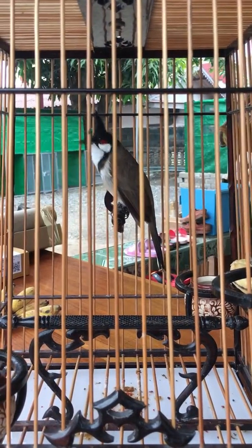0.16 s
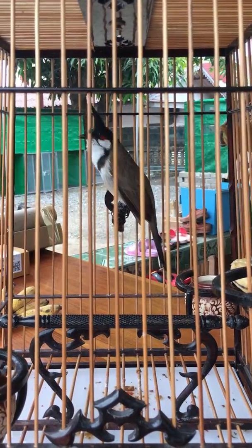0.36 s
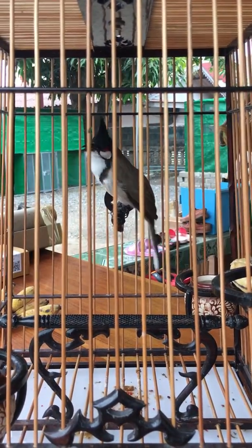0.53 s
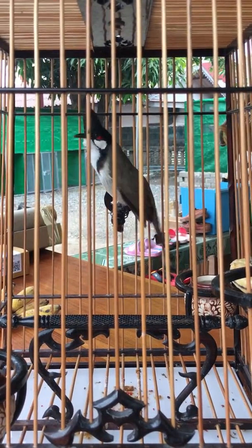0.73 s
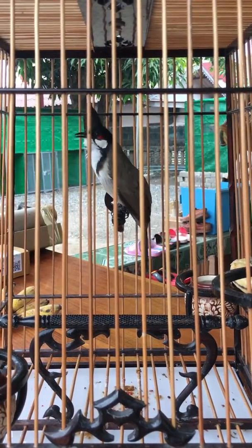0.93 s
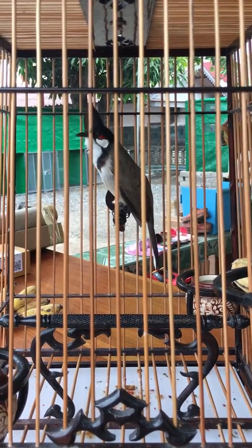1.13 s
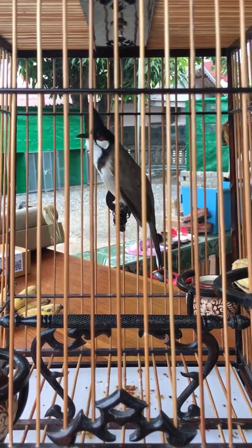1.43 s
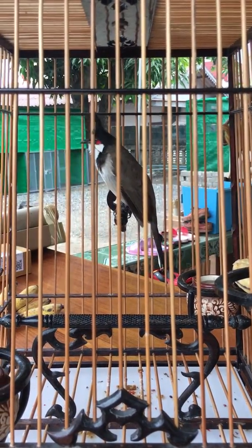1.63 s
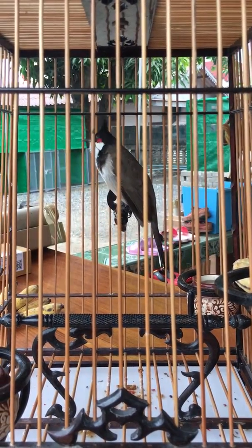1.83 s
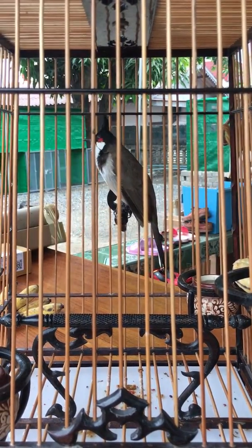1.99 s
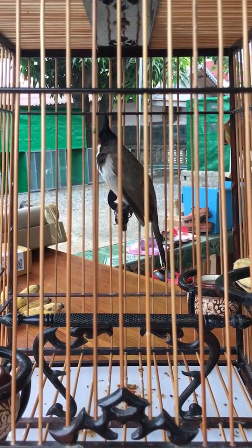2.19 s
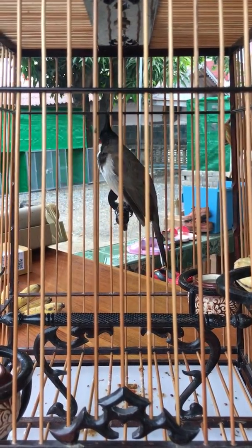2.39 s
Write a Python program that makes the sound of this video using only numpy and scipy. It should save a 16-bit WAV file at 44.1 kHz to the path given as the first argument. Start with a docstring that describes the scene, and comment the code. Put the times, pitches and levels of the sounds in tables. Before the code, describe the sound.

A caged songbird whistles five quick, loud notes close by, over a distant chugging engine

```python
"""Caged bulbul phrase

Five quick, loud whistled notes close by, under a roof with a short echo: swept sines with overtones and rasp.
Softer birds call farther off as plain sine whistles with much echo.
A distant one-cylinder engine rings its exhaust at each firing, idles, speeds up and returns to idle.
Shaped noise makes the outdoor rumble and hiss; two wavering sines make thin whines."""
import sys
import numpy as np
from scipy import signal
from scipy.fft import rfft, irfft
from scipy.io import wavfile
from scipy.ndimage import uniform_filter1d, minimum_filter1d

SR = 44100
rng = np.random.default_rng(int(sys.argv[2]) if len(sys.argv) > 2 else 0)


def dump(signal):
    """Clip the signal to [-1, 1] and save it as 16-bit WAV at the path in sys.argv[1]."""
    limited = np.clip(np.atleast_2d(signal).T, -1, 1)
    pcm = np.round(limited * 32767).astype(np.int16)
    wavfile.write(sys.argv[1], SR, pcm)


N = 112454

# outdoor rumble spectrum: freq_hz, relative_density_db
RUMBLE_SPECTRUM = [(20, -20), (90, 2), (200, 0), (430, -3.5), (540, -5.5), (820, -10.5), (1130, -4),
                   (1600, -9), (2600, -4), (3300, -9), (4500, -18.5), (9000, -40)]
# rumble level: time_s, level_db
RUMBLE_LEVEL = [(0, -38), (.2, -37.5), (.32, -41.5), (.6, -44.5), (.8, -40.5), (1.04, -41), (1.14, -36),
                (2.0, -35.5), (2.55, -37)]
# outdoor hiss spectrum: freq_hz, relative_density_db
HISS_SPECTRUM = [(2000, -8), (3600, 1), (4400, -2.5), (5000, 5.5), (5600, 2), (6400, 5.5), (7000, 0),
                 (7450, 7.5), (7950, -3), (8500, 6), (9200, -5), (10200, -2), (10700, -7), (11400, -8),
                 (12300, -15), (15500, -19)]
# hiss level: time_s, level_db
HISS_LEVEL = [(0, -44.5), (.2, -52), (.35, -52.5), (.55, -48), (1.15, -42), (2.25, -42), (2.55, -52.5)]
FLICKER_DB, FLICKER_PER_S = 1.0, 24.75

# low whine level: time_s, level_db
LOW_WHINE_LEVEL = [(0, -47), (.17, -48), (.25, -43.5), (.42, -40), (.65, -57.5), (.8, -48.5), (1.05, -54),
                   (1.7, -49.5), (2.05, -43.5), (2.55, -48)]
# high whine level: time_s, level_db
HIGH_WHINE_LEVEL = [(0, -73), (1.7, -55.5), (1.98, -46.5), (2.08, -57), (2.19, -43), (2.27, -59),
                    (2.4, -53), (2.55, -75)]
LOW_WHINE_HZ, HIGH_WHINE_HZ = 1095, 9390
WHINE_WAVER_DB, WHINE_WAVER_PER_S = 2.97, 22.19
WHINE_DRIFT_HZ, WHINE_DRIFT_PER_S = 6, 39.24

# engine speed: time_s, firings_per_s
ENGINE_SPEED = [(.6, 15.1), (.8, 16.9), (1.0, 17.8), (1.2, 18.3), (1.7, 18.3), (1.87, 17.7), (2.03, 15.1)]
# engine level, relative to ENGINE_DB: time_s, relative_level_db
ENGINE_LEVEL = [(.2, 0.5), (.3, -2.5), (1.05, -3), (1.15, -1), (2.1, 1)]
# exhaust resonances at idle: freq_hz, t60_s, relative_level_db
EXHAUST_MODES = [(62.9, .25, -8), (77.7, .25, -3), (109, 0.18, -4), (121.5, 0.11, -6), (178.4, 0.14, -18)]
FIRST_FIRING_S, ENGINE_DB = .030, -32.5
FIRING_SCATTER_DB, FIRING_SCATTER_S = 1.24, .00056
EXHAUST_HIGHPASS_HZ, EXHAUST_RISE_S = 58, .008
# tilt: dB per octave about the pivot, per firing/s above idle
REV_TILT_DB, REV_PIVOT_HZ = 2.5, 92

# distant bird calls, one curve each: time_s, pitch_hz, relative_level_db
FAR_CALLS = [
    [(0, 2468, -29.5), (.035, 2380, -32)],
    [(1.505, 2413, -42), (1.535, 2406, -29), (1.55, 2395, -24.5), (1.58, 2480, -44)],
    [(1.62, 1654, -43), (1.71, 1756, -42)],
    [(1.825, 2890, -38), (1.853, 2920, -27)],
    [(1.848, 3370, -40), (1.86, 3250, -30), (1.868, 3043, -29.5), (1.98, 3010, -42)],
    [(1.915, 3620, -38), (1.99, 3550, -40)],
    [(1.93, 1500, -37), (1.945, 1250, -37)],
]
FAR_DIRECT_DB, FAR_ECHO_DB = -1, -3
FAR_JITTER_FRACTION, FAR_JITTER_PER_S = .0096, 300

# reflections from cage, table and roof: delay_s, relative_level_db
REFLECTIONS = [(.0069, -10), (.00706, -13.5), (0.0185, -14.5)]
ROOM_DB, ROOM_T60_S, ROOM_GAP_S = -15, .38, .006
# echo tail spectrum: freq_hz, relative_density_db
ROOM_SPECTRUM = [(500, 3.5), (3500, 1.5), (7000, -2.5), (15000, -4)]

# bulbul notes, one curve each: time_s, pitch_hz, level_db
PHRASE = [
    [(.219, 1940, -36), (.226, 2246, -26), (.2336, 2530, -12.5), (.2406, 2656, -10), (.263, 2648, -5.5),
     (.2724, 2482, -9.5), (.2775, 2468, -34)],
    [(.452, 1606, -38), (.460, 2016, -20), (.470, 1930, -18.5), (.4718, 2296, -4.5), (.488, 2457, -3),
     (.4994, 2396, -8), (.5015, 2957, -3.5), (.5148, 2910, -6.5), (.5176, 2600, -4.5), (.5306, 2495, -3.5),
     (.545, 2394, -14.5), (.5505, 2450, -32)],
    [(.652, 3640, -35), (.6538, 3530, -17), (.657, 2450, -20), (.661, 2760, -13), (.6657, 3350, -9.5),
     (.6716, 3050, -8), (.678, 2880, -4.5), (.6817, 2945, -25)],
    [(.7337, 1306, -33.5), (.7414, 2337, -18), (.7447, 1900, -17), (.7528, 2420, -5), (.756, 2397, -13),
     (.766, 2940, -3), (.7707, 3520, -9.5), (.775, 3320, -7.5), (.7856, 3390, -5), (.7906, 3420, -27)],
    [(.860, 3510, -23), (.866, 2640, -19), (.872, 2855, -8), (.8765, 3150, -8.5), (.8805, 2480, -11.5),
     (.8875, 2373, -3.5), (.900, 2250, -10), (.912, 2187, -17), (.929, 2020, -15), (.944, 2100, -27)],
]
# whistle overtones, second harmonic up: relative_level_db
OVERTONES_DB = [-36, -36, -42, -31, -29]
# rasp spectrum: freq_hz, relative_density_db
RASP_SPECTRUM = [(1200, -6.5), (3500, 0), (4500, -7), (8500, -14), (10300, -11), (11700, 0), (14000, -10)]
# first-note warble
WARBLE_CREST_S, WARBLE_HZ, WARBLE_DEPTH_HZ = .2505, 115, 352
WARBLE_MIDDLE_S, WARBLE_HALF_S = .243, .019
OVERTONE_TOP_HZ, FLUTTER_DB = 13500, 1.5
BRIGHT_PIVOT_HZ, BRIGHT_DB_PER_OCTAVE = 2646, 36
# pitch tremble: always present, and extra where softer than STEADY_DB
JITTER_FRACTION, JITTER_PER_S = .0078, 490
SOFT_JITTER_FRACTION, SOFT_JITTER_PER_S, STEADY_DB = .042, 520, -11
RASP_DB, RASP_POWER, RASP_DB_PER_OCTAVE = -34, .65, -12
# low puff as the fourth note starts
PUFF_S, PUFF_WIDTH_S, PUFF_DB, PUFF_HZ = .739, .010, -38, 1500

LOWPASS_HZ, CEILING, LIMITER_SAMPLES = 15720, .88, 256


def undb(db):
    """Decibels to gain."""
    return 10 ** (np.asarray(db) / 20)


def unit(x):
    """Scale to an rms of 1."""
    return x / np.sqrt(np.mean(x ** 2))


def clock():
    """Time of every sample, in seconds."""
    return np.arange(N) / SR


def curve(rows, axis=1):
    """One table column, linearly interpolated in time."""
    rows = np.array(rows, float)
    return np.interp(clock(), rows[:, 0], rows[:, axis])


def walk(rate_per_s):
    """Smooth random wander, rms 1 or near it: held random values, averaged twice."""
    hold = max(int(SR / rate_per_s), 1)
    steps = np.repeat(rng.standard_normal(N // hold + 1), hold)
    smooth = uniform_filter1d(uniform_filter1d(steps, hold), hold)
    return unit(smooth)[:N] if len(smooth) == N else unit(smooth[:N])


def noise(spectrum):
    """Unit-rms noise shaped by (freq_hz, db) points, joined on a log frequency axis."""
    freq_hz, db = np.array(spectrum, float).T
    bins_hz = np.maximum(np.fft.rfftfreq(N, 1 / SR), 1)
    gain = undb(np.interp(np.log(bins_hz), np.log(freq_hz), db))
    return unit(irfft(rfft(rng.standard_normal(N)) * gain, N))


def turn(hz):
    """Phase of an oscillator at a moving pitch."""
    return 2 * np.pi * np.cumsum(hz) / SR


def fade(t60_s):
    """Exponential decay from time zero, 60 dB in t60_s."""
    return np.exp(-np.log(1000) * clock() / t60_s)


def note(rows):
    """Pitch and gain of one note, silent outside its curve."""
    t = clock()
    sounding = (t >= rows[0][0]) & (t <= rows[-1][0])
    gate = uniform_filter1d(sounding * 1., size=64)
    return curve(rows), undb(curve(rows, axis=2)) * gate


def echo(x):
    """Diffuse tail of the roofed space: convolution with decaying noise after a short gap."""
    tail = noise(ROOM_SPECTRUM) * fade(ROOM_T60_S) * (clock() > ROOM_GAP_S)
    tail = tail / np.sqrt(2 * np.sum(tail ** 2))
    return signal.fftconvolve(x, tail)[:N]


def outdoors():
    """Rumble and hiss: two shaped noises, each with a slight random level flicker."""
    out = 0
    for spectrum, level in [(RUMBLE_SPECTRUM, RUMBLE_LEVEL), (HISS_SPECTRUM, HISS_LEVEL)]:
        level_db = curve(level) + FLICKER_DB * walk(FLICKER_PER_S)
        out = out + noise(spectrum) * undb(level_db)
    return out


def whines():
    """Two thin sines, wavering in pitch and level."""
    out = 0
    for hz, level in [(LOW_WHINE_HZ, LOW_WHINE_LEVEL), (HIGH_WHINE_HZ, HIGH_WHINE_LEVEL)]:
        level_db = curve(level) + WHINE_WAVER_DB * walk(WHINE_WAVER_PER_S)
        phase = turn(hz + WHINE_DRIFT_HZ * walk(WHINE_DRIFT_PER_S))
        out = out + undb(level_db) * np.sin(phase)
    return out


def firing_pulses(lead):
    """Impulses at each whole engine cycle, scattered in time and strength, with a lead-in at idle."""
    idle = ENGINE_SPEED[0][1]
    speed = np.r_[np.full(lead, idle), curve(ENGINE_SPEED)]
    cycles = np.cumsum(speed) / SR - (lead / SR + FIRST_FIRING_S) * idle
    at = np.flatnonzero(np.diff(np.floor(cycles)))
    chance = rng.standard_normal((64, 2))[:len(at)]
    at = at + FIRING_SCATTER_S * SR * chance[:, 0]
    at = np.clip(at, 0, len(cycles) - 1).astype(int)
    pulses = np.zeros(len(cycles))
    pulses[at] = undb(FIRING_SCATTER_DB * chance[:, 1])
    return pulses


def engine():
    """Each firing rings the low exhaust resonances; the thump brightens with speed."""
    t, out = clock(), 0
    lead = SR // 2  # engine already running at time zero
    pulses = firing_pulses(lead)
    revs_above_idle = curve(ENGINE_SPEED) - ENGINE_SPEED[0][1]
    highpass = signal.butter(8, EXHAUST_HIGHPASS_HZ, "high", fs=SR, output="sos")
    for hz, t60_s, db in EXHAUST_MODES:
        ring = np.sin(2 * np.pi * hz * t) * fade(t60_s) * (1 - np.exp(-t / EXHAUST_RISE_S))
        ring = signal.sosfilt(highpass, ring)
        mode_db = db + REV_TILT_DB * revs_above_idle * np.log2(hz / REV_PIVOT_HZ)
        out = out + undb(mode_db) * signal.fftconvolve(pulses, ring)[lead:lead + N]
    return undb(ENGINE_DB + curve(ENGINE_LEVEL)) * unit(out)


def far_birds():
    """Soft sine whistles with a slight pitch tremble, much of them echo."""
    unsteady = 1 + FAR_JITTER_FRACTION * walk(FAR_JITTER_PER_S)
    calls = 0
    for hz, gain in map(note, FAR_CALLS):
        calls = calls + gain * np.sin(turn(hz * unsteady))
    return undb(FAR_DIRECT_DB) * calls + undb(FAR_ECHO_DB) * echo(calls)


def cage(x):
    """Direct sound, a few close reflections and the diffuse tail."""
    t = clock()
    close = sum(undb(db) * np.interp(t - delay_s, t, x, left=0) for delay_s, db in REFLECTIONS)
    return x + close + undb(ROOM_DB) * echo(x)


def puff():
    """Soft low puff: a short bell-shaped burst of band-passed noise."""
    band = signal.butter(2, [PUFF_HZ / 2, PUFF_HZ * 2], "band", fs=SR, output="sos")
    dull = unit(signal.sosfilt(band, rng.standard_normal(N)))
    return undb(PUFF_DB) * dull * np.exp(-((clock() - PUFF_S) / PUFF_WIDTH_S) ** 2)


def first_note_warble():
    """Fast pitch swing in Hz, confined to the first note by a flat-topped window."""
    t = clock()
    window = np.exp(-((t - WARBLE_MIDDLE_S) / WARBLE_HALF_S) ** 4)
    return WARBLE_DEPTH_HZ * np.cos(2 * np.pi * WARBLE_HZ * (t - WARBLE_CREST_S)) * window


def whistle(hz, phase, flutter):
    """Nearly pure tone: a sine plus faint, fluttering overtones."""
    bright = undb(BRIGHT_DB_PER_OCTAVE * np.log2(hz / BRIGHT_PIVOT_HZ))
    tone = np.sin(phase)
    for k, db in enumerate(OVERTONES_DB, 2):
        # harmonics 2 and 3 grow with pitch; higher ones roll off at the top
        colour = bright if k < 4 else 1 / (1 + (k * hz / OVERTONE_TOP_HZ) ** 8)
        tone = tone + undb(db) * colour * flutter * np.sin(k * phase)
    return tone


def bulbul():
    """Fluttering whistle along each pitch curve, with a thin noise rasp stronger on low notes."""
    warble_hz = first_note_warble()
    unsteady = 1 + JITTER_FRACTION * walk(JITTER_PER_S)
    rasp = undb(RASP_DB) * noise(RASP_SPECTRUM)
    flutter = undb(FLUTTER_DB * walk(JITTER_PER_S))
    out = 0
    for hz, gain in map(note, PHRASE):
        softness = 1 / (1 + (gain / undb(STEADY_DB)) ** 2)
        rough = SOFT_JITTER_FRACTION * walk(SOFT_JITTER_PER_S) * softness
        phase = turn((hz + warble_hz) * (unsteady + rough))
        rasp_tilt = undb(RASP_DB_PER_OCTAVE * np.log2(hz / BRIGHT_PIVOT_HZ))
        out = out + gain * flutter * whistle(hz, phase, flutter)
        out = out + gain ** RASP_POWER * rasp_tilt * rasp
    return out


def scene():
    """Bulbul in front, everything else behind."""
    behind = outdoors() + whines() + engine() + far_birds()
    return (behind + cage(puff() + bulbul()))[None]


def record(dry):
    """Quick limiter on the loudest peaks, then a steep low-pass."""
    needed_gain = CEILING / np.maximum(np.abs(dry), CEILING)
    held_gain = minimum_filter1d(needed_gain, size=LIMITER_SAMPLES)
    gain = uniform_filter1d(held_gain, size=LIMITER_SAMPLES)
    lowpass = signal.ellip(12, .2, 90, LOWPASS_HZ, fs=SR, output="sos")
    return signal.sosfilt(lowpass, dry * gain)


dry = scene()
out = record(dry)
dump(out)
```